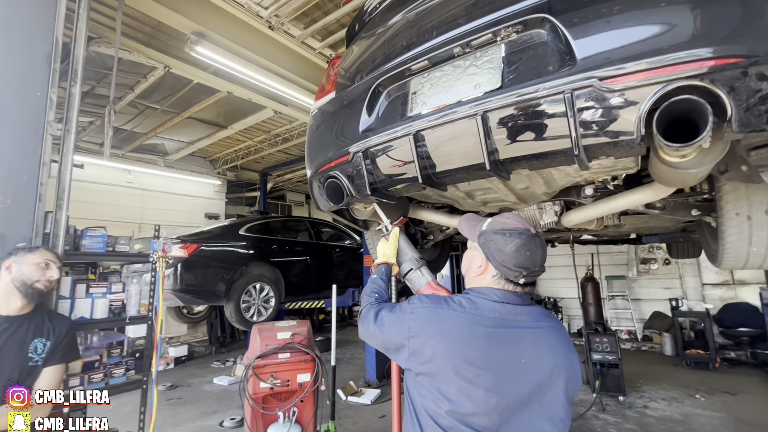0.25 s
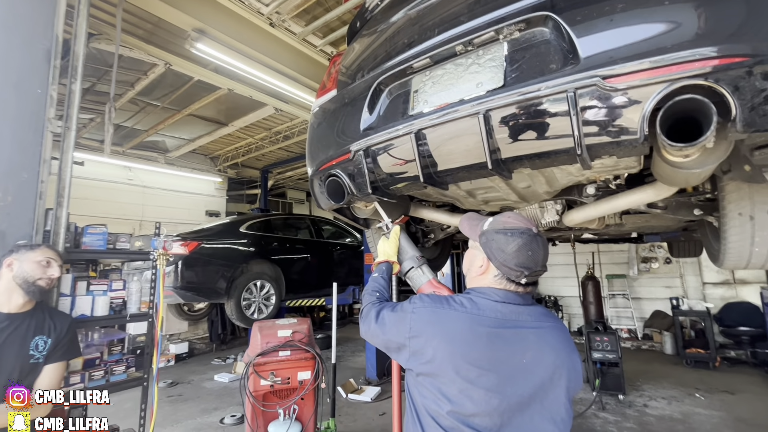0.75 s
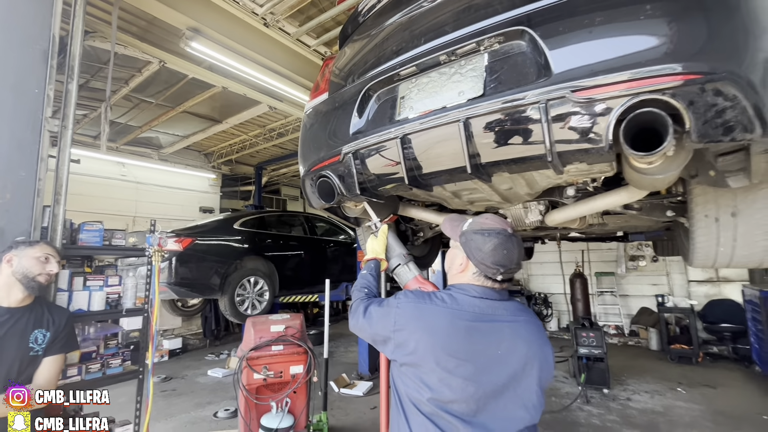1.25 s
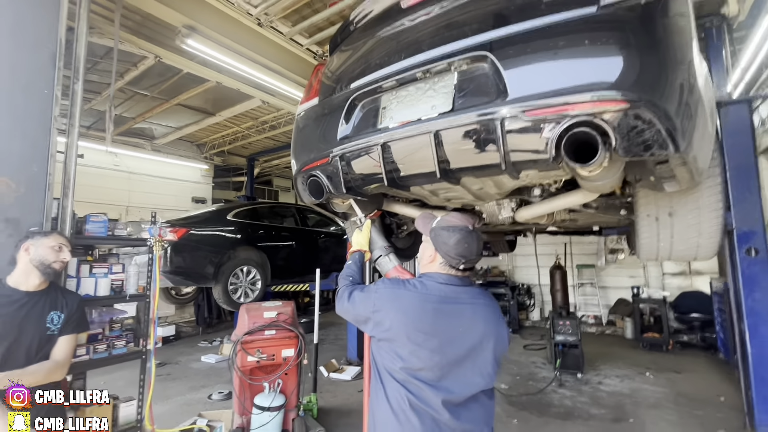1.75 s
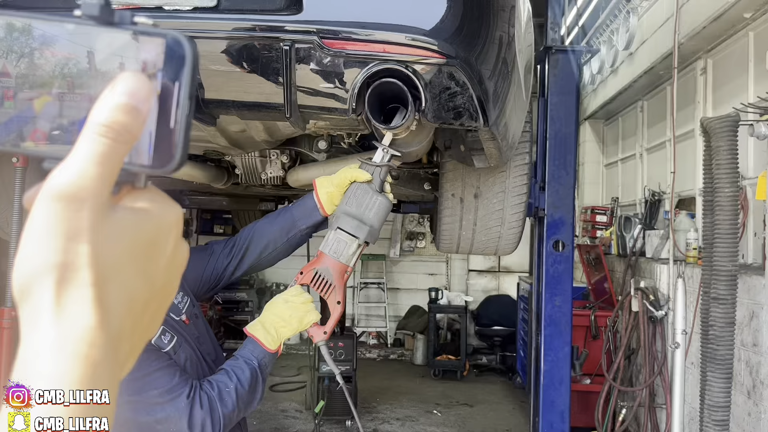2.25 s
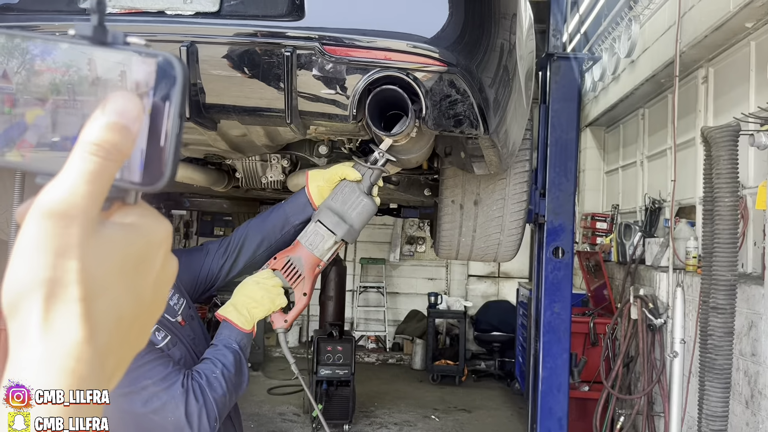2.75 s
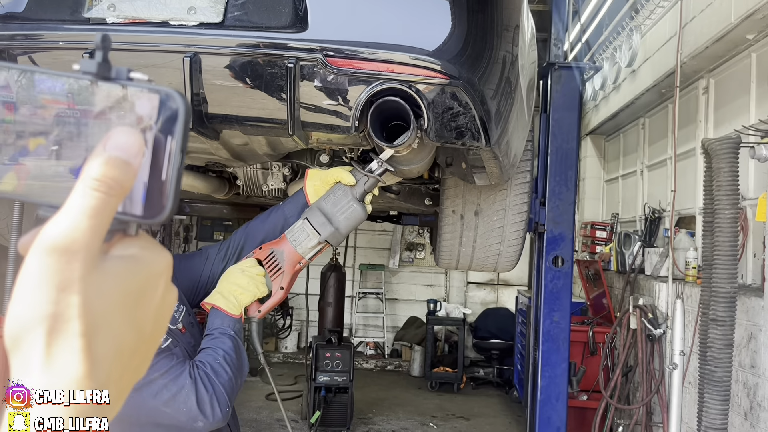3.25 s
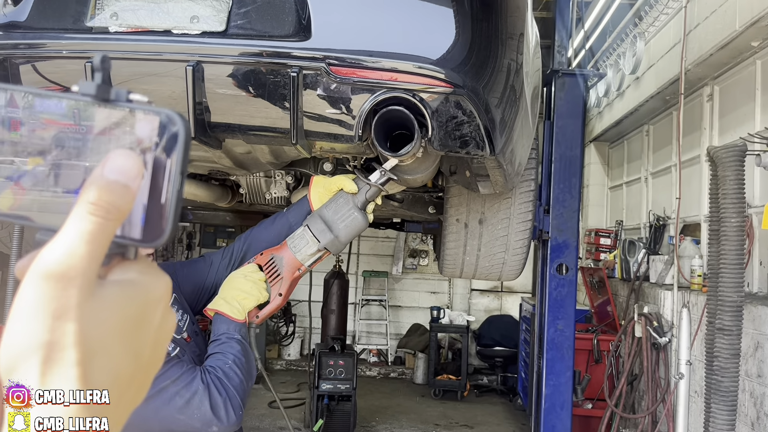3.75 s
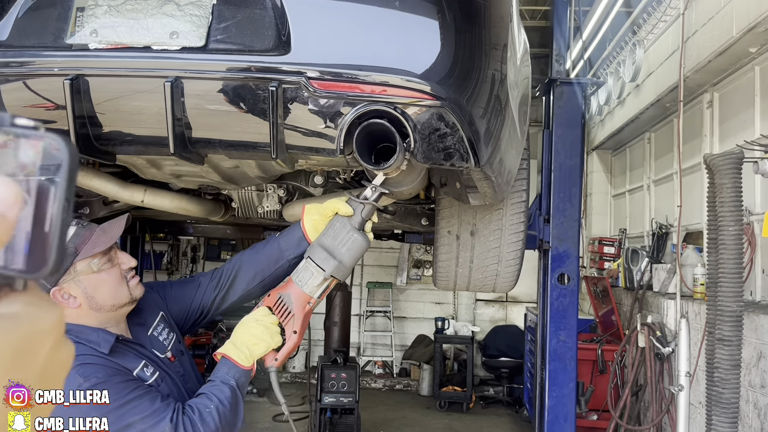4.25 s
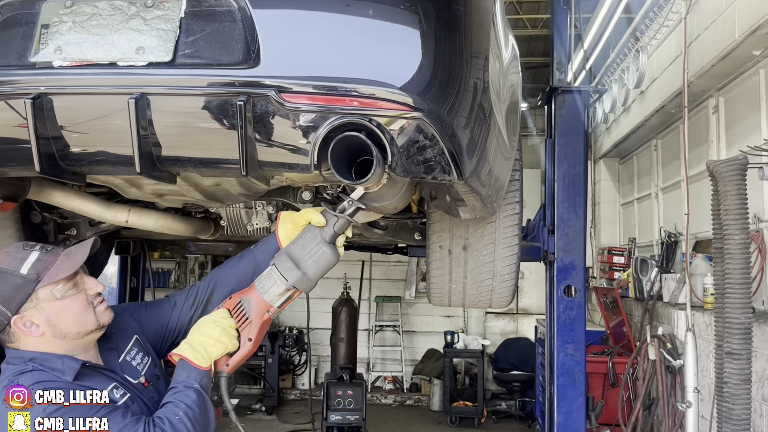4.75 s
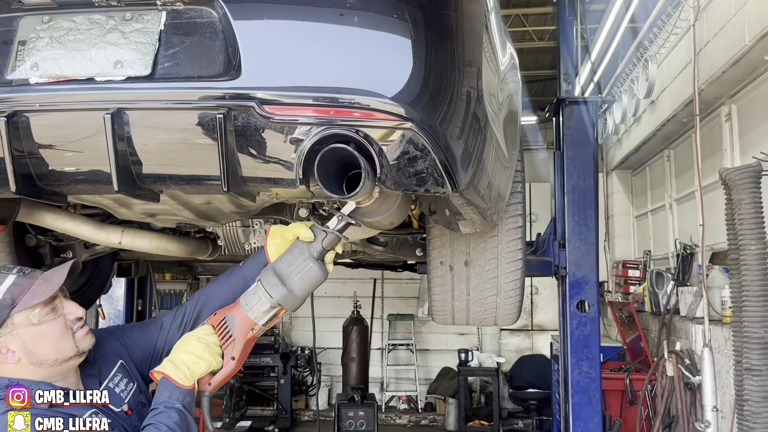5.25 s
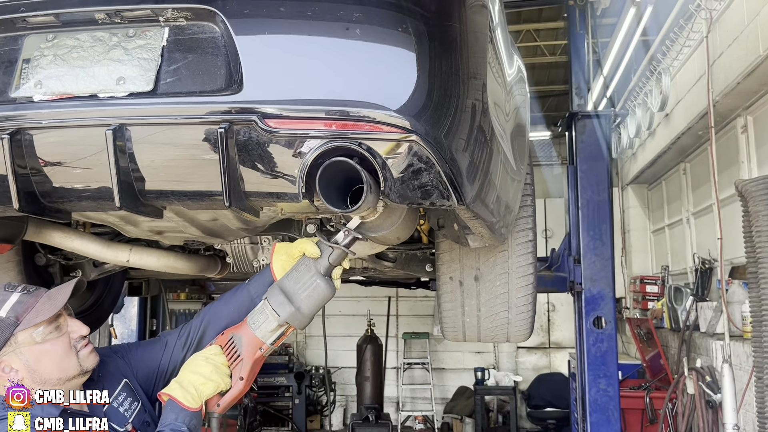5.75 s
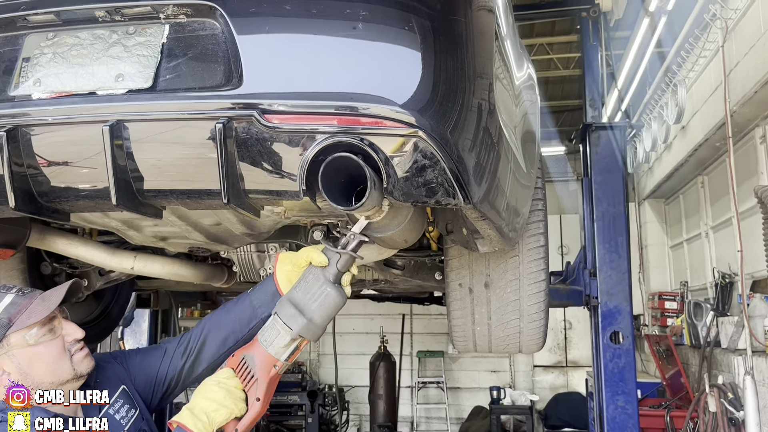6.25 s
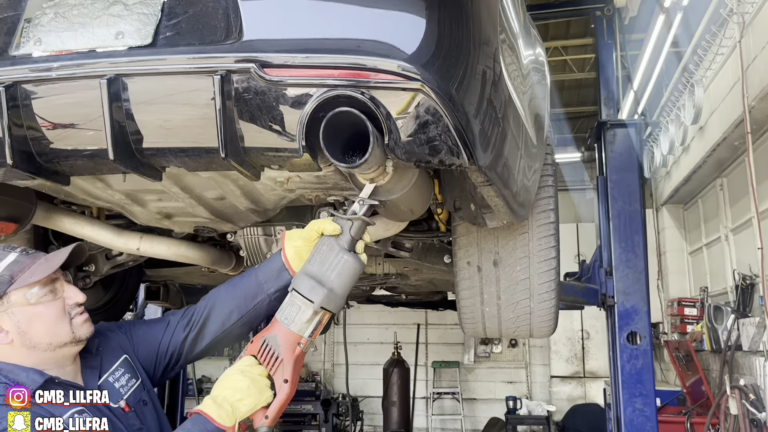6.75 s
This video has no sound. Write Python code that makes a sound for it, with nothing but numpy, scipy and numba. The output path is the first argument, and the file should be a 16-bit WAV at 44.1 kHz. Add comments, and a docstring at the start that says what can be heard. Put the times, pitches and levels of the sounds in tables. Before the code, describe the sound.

A corded reciprocating saw cuts steel exhaust pipes in a hard-walled repair shop, heard close in stereo. From 0 s it buzzes at about 46 strokes a second, with gear rattle, bright tooth rasp, a high wavering motor whine and light chattering on the pipe. Around 1.2-1.5 s the blade sinks in and binds; chatter fades and clear metallic tones sing until 2.25 s. At 2.3 s the sound dips almost to silence for an instant, then a second cut begins, slower near 43 strokes, rougher and more echoing. Harsh squealing scrapes dominate to about 3.1 s, then the rasp settles into loose slapping rattle. Low booms swell near 2.6, 3.9, 4.6 and 6.75 s; scraping returns around 4.2-4.4 s. The pipe wall rings near 5.6 s, a sharp snag briefly slows the saw at 6.1-6.3 s, and cutting continues to the end near 7 s.

```python
"""In a repair shop, under a lifted car, a corded reciprocating saw cuts a steel exhaust pipe: first one
tailpipe, then, after a brief dip, the other. The gear train's rattle repeats with the strokes and drifts
slowly, the teeth rasp as noise on the way out and back, and the motor fan whines as a wavering tone.
Slaps ring the pipe wall as chatter; it sings where the blade catches its modes.
Hard shop walls spread it all over two close microphones."""
import sys
import numpy as np
from scipy import signal
from scipy.fft import rfft, irfft, next_fast_len
from scipy.io import wavfile
from scipy.ndimage import uniform_filter1d
from numba import njit

SR = 44100
rng = np.random.default_rng(int(sys.argv[2]) if len(sys.argv) > 2 else 0)


def put_to_file(sound):
    """Save the sound as 16-bit audio at rate SR, in the file named by the first command-line argument."""
    columns = np.atleast_2d(sound).T  # one column per channel
    safe = np.clip(columns, -1, 1)
    whole_steps = np.round(safe * 32767)
    wavfile.write(sys.argv[1], SR, whole_steps.astype(np.int16))


N = 308259
TIME = np.arange(N) / SR
SIZE = next_fast_len(N + SR)
BINS = np.arange(SIZE // 2 + 1) * SR / SIZE  # Hz

# narrow resonances of the second steel tailpipe: mode_hz, lift_db
MODES_SECOND = [(1970, 2.7), (2083, 1.7), (2298, 3.3), (2640, 1.7), (2870, 4.6), (4387, 5.9), (4462, 3.6),
                (4618, 1.5), (4995, 2.5), (5717, 0.84), (6389, 8.2), (6782, 7.9), (11751, 5.6),
                (12979, 3.9)]
SECOND_CUT_S = 2.291  # the dip between the two cuts
WHINE_DB = -39


def undb(db):
    """Decibels to gain."""
    return 10 ** (np.asarray(db) / 20)


def curves(table):
    """The columns of a table, joined by straight lines in time."""
    s, *columns = np.transpose(table)
    return [np.interp(TIME, s, c) for c in columns]


def spectra(table):
    """The columns of a table, joined by straight lines in log frequency."""
    hz, *columns = np.transpose(table)
    return [np.interp(np.log(BINS + 1), np.log(hz), c) for c in columns]


def shape(x, response):
    """Filter by a frequency response."""
    return irfft(rfft(x, SIZE) * response, SIZE)[:N]


def unit(x):
    """Scale to rms 1."""
    return x / np.sqrt(np.mean(x ** 2))


def walk(rate):
    """Random levels, a new one every 1 / rate s, joined by straight slopes; rms 1."""
    hold = int(SR / rate)
    steps = np.repeat(rng.standard_normal(N // hold + 1), hold)
    return unit(uniform_filter1d(steps, hold)[:N])


def swell(middle, half):
    """A smooth rise to 1 and fall around a moment."""
    return np.exp(-((TIME - middle) / half) ** 2)


def lift(modes, width_hz):
    """Decibels that the pipe's narrow resonances add at each frequency."""
    return sum(db / (1 + (2 * (BINS - hz) / width_hz) ** 2) for hz, db in modes)


@njit
def resonate(x, hz, width):
    """State-variable band-pass with a moving centre."""
    y, band, low = np.empty(len(x)), 0., 0.
    for i in range(len(x)):
        g = np.tan(np.pi * hz[i] / SR)
        damping = width / hz[i]
        v = (band + g * (x[i] - low)) / (1 + g * (g + damping))
        band, low = 2 * v - band, low + 2 * g * v
        y[i] = damping * v
    return y


def blurred_tone(hz, width_hz):
    """Noise passed twice through a moving resonance."""
    noise = rng.standard_normal(len(hz))
    return unit(resonate(resonate(noise, hz, width_hz), hz, width_hz))


def crank(speed, unsteady):
    """Strokes counted since the start; the load makes the speed tremble."""
    return np.cumsum(speed * (1 + unsteady * walk(70))) / SR


def rattle(turn, lines=160, size=8192):
    """A rattle of equal harmonics that comes back alike with every turn of the crank."""
    one_turn = irfft(np.r_[0, np.exp(2j * np.pi * rng.random(lines))], size)
    return unit(np.interp(turn % 1, np.arange(size) / size, one_turn))


def gears(turn, shift):
    """The gear train's rattle changes slowly as the grip shifts."""
    drift = walk(2.055) * rattle(turn) + walk(2.96) * rattle(turn)
    return unit(rattle(turn) + shift * drift)


def saw(turn, body, modes, rattle_db, rasp_db, split_hz, mode_width_hz, loose, loose_hz,
        shake, shake_hz, throb_db, grit_db):
    """Gear rattle and tooth rasp through the resonances of saw and pipe, levelled below and above a split."""
    # the blade moves fastest twice a turn and bites harder on the pull
    bite = np.cos(4 * np.pi * turn) + 0.5 * np.cos(2 * np.pi * turn)
    teeth = unit(rng.standard_normal(N) * undb(throb_db * bite + grit_db * walk(700)))
    # play in the mechanism turns the higher lines into noise; the shaking car blurs the low ones
    regular = (1 - np.clip(loose, 0, 1)) / (1 + (BINS / loose_hz) ** 3)
    regular = regular * (1 - np.clip(shake, 0, 1) / (1 + (BINS / shake_hz) ** 4))
    # 160 lines about 45 Hz apart fill only part of the band that the noise fills
    line_density = np.sqrt(160 * 45 / (SR / 2))
    lines = shape(gears(turn, shift=0.46) * line_density, np.sqrt(regular))
    drive = lines + shape(teeth, np.sqrt(1 - regular))
    colour_db = spectra(body)[0] + lift(modes, mode_width_hz)
    sound = unit(shape(drive, undb(colour_db)))
    low = shape(sound, 1 / (1 + (BINS / split_hz) ** 6))
    return low * undb(rattle_db) + (sound - low) * undb(rasp_db)


def chatter(turn, hz, db, count, rebound, uneven, scatter_db, accent_db, sag, wander, scrape, width_hz):
    """The pipe wall slaps the blade once a stroke and rebounds, count knocks in all, on a wandering pitch."""
    angle = 2 * np.pi * turn
    knock = (count * (turn + uneven * np.sin(angle))).astype(int)
    scatter = np.clip(rng.standard_normal(1500), -1.5, 1.5)
    strength = undb(scatter_db * scatter[knock])
    main_or_rebound = np.where(knock % count, rebound, 1)
    slap = unit(np.diff(knock, prepend=0) * main_or_rebound * strength)
    # the wall also rubs, 3 dB up and down with the stroke
    rub = unit(undb(3 * np.cos(angle)) * rng.standard_normal(N))
    hz = hz * (1 + sag * np.cos(angle) + wander * walk(110))
    ring = slap * undb(accent_db) + scrape * rub
    for _ in range(3):
        ring = resonate(ring, hz, width_hz)
    return unit(ring) * undb(db)


def singing(turn, speed, catches, width_hz, throb_db, edge_s):
    """A caught mode takes the nearest multiple of the stroke rate, blurred by scraping, pumped by strokes."""
    out = np.zeros(N)
    for start, end, mode_hz, level_db, pure in catches:
        span = (TIME > start - edge_s) & (TIME < end + edge_s)
        t = TIME[span]
        hz = speed[span] * np.round(mode_hz / speed[span].mean())
        blur = blurred_tone(hz, width_hz)
        tone = np.sin(2 * np.pi * (np.cumsum(hz) / SR + rng.random()))
        held = np.clip(np.minimum(t - start, end - t) / (2 * edge_s) + .5, 0, 1)
        out[span] += undb(level_db) * held * unit(blur + pure * tone)
    pumping = undb(throb_db * (np.cos(2 * np.pi * turn) + .5 * walk(80)))
    return out * unit(pumping)


def fan(turn, db, flutter_db, swing):
    """The motor's whine, 190 cycles a stroke, its phase pulled to and fro by the load of each stroke."""
    angle = 2 * np.pi * 190 * turn + swing * np.sin(2 * np.pi * turn)
    flutter = undb(flutter_db * walk(25.3) + 2 * walk(3.5))
    return undb(db) * unit(np.sin(angle) * flutter)


def first_cut():
    """The blade skates and chatters on the first tailpipe, then sinks in, binds and sets it singing."""
    # colour of saw and pipe together: frequency_hz, level_db
    body_colour = [(28, -34), (44, -5.5), (80, -13), (130, -9), (250, -14), (580, -7.5), (830, -7),
                   (1400, -3), (2250, -7), (3000, -9), (4600, -12), (5800, -12), (8000, -14.5),
                   (10500, -11), (15000, -19.5)]
    # narrow resonances of the steel tailpipe: mode_hz, lift_db
    pipe_modes = [(2226, 0.5), (2266, 7), (2750, 4.5), (4403, 6), (4958, 8), (6626, 3), (9786, -11),
                  (10276, 0)]
    # the blade catches a mode and it sings: start_s, end_s, mode_hz, level_db, tone_to_blur (ratio)
    catches = [(0, .65, 975, -39, 3), (0, .7, 882, -41, 5), (0, .8, 2230, -38, 2), (0, .6, 2272, -39, 2),
               (.3, .7, 1066, -37, 4), (.3, .6, 1345, -37, 4), (0, 1.35, 1156, -40, 3),
               (.75, 1.3, 833, -40, 5), (.85, 1.1, 1295, -35, 3), (.85, 1.2, 1990, -36, 3),
               (.95, 1.15, 2635, -36, 3), (.95, 1.3, 2730, -39, 3), (1.26, 1.42, 1982, -32, 3),
               (1.3, 1.85, 276, -39, 2), (1.3, 1.85, 368, -41, 2), (1.36, 1.77, 1104, -31, 6),
               (1.35, 1.8, 830, -34.5, 6), (1.38, 1.6, 1658, -37, 4), (1.38, 2.28, 920, -35.5, 8),
               (1.35, 1.72, 1150, -36, 2), (1.75, 2.28, 1150, -29.5, 8), (1.78, 2.28, 1012, -39, 5),
               (1.79, 1.87, 1980, -32, 2), (1.94, 2.02, 1980, -31.5, 2), (2.06, 2.12, 1980, -32, 2),
               (2.18, 2.27, 1980, -33.5, 2)]
    # sinking into the wall slows the motor and stills the chatter
    sunk = 1 / (1 + np.exp((1.15 - TIME) / 0.17))
    speed = 46.39 - .39 * sunk  # strokes per second
    turn = crank(speed, unsteady=0.00209)
    binding_db = 3.5 * swell(1.48, 0.26)
    body = saw(turn, body_colour, pipe_modes, rattle_db=-24.5 + binding_db, rasp_db=-22.0 - 1.05 * sunk,
               split_hz=2150, mode_width_hz=116.0, loose=0.37, loose_hz=3000,
               shake=0.22, shake_hz=196, throb_db=0.1, grit_db=1.6)
    ticks = chatter(turn, hz=2080, db=-30 - 8 * sunk, count=4, rebound=.55, uneven=.09, scatter_db=2,
                    accent_db=0, sag=.02, wander=.025, scrape=.2, width_hz=680.)
    knocks = chatter(turn, hz=1170, db=-34.5 - 1 * sunk, count=3, rebound=.9, uneven=.03, scatter_db=3,
                     accent_db=0, sag=.02, wander=.04, scrape=.1, width_hz=700.)
    song = singing(turn, speed, catches, width_hz=35., throb_db=1.2, edge_s=.02)
    whine = fan(turn, WHINE_DB, flutter_db=2.5, swing=3.4)
    return body + ticks + knocks + song + whine


def snags(turn, throb_db, mode_width_hz):
    """Caught teeth scrape a whole cluster of pipe modes harshly, stroke by stroke."""
    # the moments the blade snags: middle_s, half_length_s, centre_hz, width_hz (of each of two passes), level_db
    snag_moments = [(2.325, .03, 2900, 350, -26), (2.36, .03, 2310, 220, -27.5),
                    (2.475, .025, 2300, 220, -25.5), (2.52, .16, 2080, 340, -29),
                    (2.6, .06, 2270, 240, -28.5), (2.8, .12, 2290, 190, -28), (2.95, .45, 2840, 200, -31.5),
                    (2.94, .02, 2300, 190, -28), (3.06, .1, 2300, 190, -28), (3.48, .15, 2300, 190, -34),
                    (4.17, .18, 2700, 480, -28.5), (4.28, .03, 2280, 220, -28), (4.42, .1, 2790, 450, -27),
                    (4.46, .03, 2300, 220, -30), (6.115, .035, 2250, 600, -28),
                    (6.125, .045, 3050, 700, -27.5), (6.5, .35, 2830, 250, -37)]
    out, steady = np.zeros(N), np.ones(N)
    strokes = undb(throb_db * np.cos(2 * np.pi * turn))
    scrape = shape(rng.standard_normal(N) * strokes, undb(lift(MODES_SECOND, mode_width_hz)))
    for middle, half, hz, width, level_db in snag_moments:
        ring = resonate(scrape, hz * steady, float(width))
        ring = resonate(ring, hz * steady, float(width))
        out += unit(ring) * undb(level_db) * swell(middle, half)
    return out


def boom(hz, db, width_hz, pure):
    """The whole exhaust shakes on its hangers: a low tone over its own blur."""
    tone = np.sin(2 * np.pi * np.cumsum(hz) / SR)
    return unit(blurred_tone(hz, width_hz) + pure * tone) * undb(db)


def shaft(turn, db):
    """The hum of the motor shaft, geared at 9.5 turns to the stroke."""
    return undb(db) * unit(np.sin(2 * np.pi * 9.5 * turn))


def wall_ring(slaps):
    """Each slap feeds the narrow modes of the half-cut wall, which ring on until the next."""
    # modes of the wall: mode_hz, width_hz, gain_db
    wall_modes = [(1537, 30, -7), (1622, 30, -2)]
    return sum(undb(db) * resonate(slaps, np.full(N, float(hz)), float(width))
               for hz, width, db in wall_modes)


def second_cut():
    """The saw is leaned on again and again; the other tailpipe loosens, rattling more and booming lower."""
    # colour of saw and pipe together: frequency_hz, level_db
    body_colour = [(28, -28), (42, 2), (85, -2.5), (130, 1), (185, -4.5), (240, -2.5), (340, -5),
                   (460, 0.5), (630, -6.5), (1150, 3), (1750, -1.5), (2300, 1.5), (2900, -0.6),
                   (3900, -5.5), (5400, -9), (7000, -7.5), (11000, -12), (13500, -13), (15000, -21)]
    # slapping of the half-cut wall: time_s, level_db, resonance_hz
    slap_course = [(2.33, -30.5, 1460), (2.62, -30, 1450), (2.75, -26.3, 1440), (3.25, -28, 1430),
                   (3.55, -26.4, 1440), (4.05, -27.8, 1390), (4.3, -33, 1410), (4.48, -33.5, 1410),
                   (4.6, -28.5, 1360), (5.45, -29.2, 1480), (6.1, -29.2, 1470), (6.95, -30, 1420)]
    # strokes on which the wall slaps the blade hard: time_s, lift_db
    hard_slaps = [(2.689, 3), (2.808, 1.5), (2.855, 1.5), (2.925, 2.5), (3.018, 2.5), (3.065, 2.5),
                  (3.369, 2), (3.416, 2), (3.463, 2), (3.511, 2), (3.558, 2.5), (3.651, 2), (3.698, 1.5),
                  (5.201, 3), (5.317, 2), (5.481, 2), (5.504, 2), (5.692, 2), (5.739, 1.5), (6.021, 2.5),
                  (6.208, 3.5), (6.232, 3), (6.303, 3.5)]
    # leaning on the saw slows it and shakes the exhaust:
    # middle_s, half_length_s, slowing_hz (strokes per second), boom_lift_db
    presses = [(2.6, .35, .152, 11), (3.85, .3, .393, 6), (4.6, .4, .062, 9), (6.3, .12, .838, 1),
               (6.75, .27, .129, 10)]
    # the blade catches a mode and it sings: start_s, end_s, mode_hz, level_db, tone_to_blur (ratio)
    catches = [(2.3, 2.37, 2087, -30, 2), (2.385, 2.46, 2087, -25.5, 3), (2.49, 2.58, 2087, -24, 3),
               (2.6, 2.665, 2050, -28.5, 1.5), (2.48, 2.66, 1970, -32, 1.5), (2.3, 2.36, 2940, -29, 1.5),
               (2.3, 2.6, 213, -39.5, 6), (2.6, 3.1, 213, -45, 4), (2.3, 3.9, 128, -45, 2),
               (2.3, 2.66, 1450, -37, 3), (2.65, 2.9, 1410, -36, 3), (3.07, 3.18, 1970, -30.5, 3),
               (3.2, 3.38, 1970, -38, 2), (3.35, 3.6, 2645, -31.5, 3), (3.4, 3.7, 170, -44, 2),
               (4.22, 5.15, 298, -45, 3), (4.53, 4.6, 1970, -34, 2), (4.6, 5.6, 255, -51, 4),
               (4.98, 5.03, 1970, -34, 2), (5.0, 6.95, 213, -46, 4), (5.3, 6.4, 298, -48, 2.5),
               (5.35, 5.41, 1970, -36.5, 3), (5.59, 5.65, 1970, -34, 3), (5.79, 5.84, 1970, -36, 3),
               (5.8, 6.25, 170, -43.5, 2), (6.05, 6.15, 3310, -38, 1), (6.098, 6.135, 2300, -28.5, 2),
               (6.1, 6.145, 1970, -29.5, 3), (6.11, 6.3, 2875, -34, 2.5), (6.12, 6.15, 3030, -32, 1.5),
               (6.215, 6.25, 1970, -33, 3), (6.3, 6.55, 2875, -38, 2)]
    elapsed = np.maximum(TIME - SECOND_CUT_S, 0)
    through_s = 7.3  # when the wall would part
    stiffness = np.clip(1 - elapsed / (through_s - SECOND_CUT_S), .01, 1) ** 0.125
    slowing = sum(hz * swell(middle, half) for middle, half, hz, _ in presses)
    shaken_db = sum(db * swell(middle, half) for middle, half, _, db in presses)
    speed = 42.724 - slowing  # strokes per second
    turn = .19 + crank(speed, unsteady=0.0022)
    fresh_db = 10 * np.exp(-elapsed / 1.43)  # the rasp starts loud and settles
    rasp_db = -27.5 + fresh_db + 10.5 * (1 - stiffness)
    body = saw(turn, body_colour, MODES_SECOND, rattle_db=-26.0 + 2.3 * (1 - stiffness), rasp_db=rasp_db,
               split_hz=2750, mode_width_hz=45., loose=0.73, loose_hz=2430,
               shake=0.97, shake_hz=700, throb_db=0.6, grit_db=1.33)
    slap_db, slap_hz = curves(slap_course)
    accent_db = sum(db * swell(s, .006) for s, db in hard_slaps)
    slaps = chatter(turn, hz=slap_hz, db=slap_db, count=3, rebound=.4, uneven=0, scatter_db=1.4,
                    accent_db=accent_db, sag=.035, wander=.024, scrape=.2, width_hz=265.)
    free_ring = wall_ring(slaps) * swell(5.65, .55)
    song = singing(turn, speed, catches, width_hz=52.0, throb_db=1.9, edge_s=.012)
    hangers = boom(81 * stiffness, db=-49.5 + shaken_db, width_hz=18.0, pure=2.2)
    scrapes = snags(turn, throb_db=0.5, mode_width_hz=30.0)
    whine = fan(turn, WHINE_DB, flutter_db=1.5, swing=0.33)
    hum = shaft(turn, db=-61.5 + 14 * swell(6.2, 1.2))
    return body + slaps + free_ring + song + hangers + scrapes + whine + hum


def shop(x, ports, wet_db, t60):
    """Direct sound reaches the two microphones with a lag; wall echoes reach them unalike."""
    likeness, lead, balance_db = spectra(ports)
    likeness = np.clip(likeness, 0, .99)
    t = TIME[:SR // 2]
    tails = rng.standard_normal((2, len(t))) * undb(-60 * t / t60) * (t > .003)
    common, apart = rfft(tails / np.linalg.norm(tails, axis=1, keepdims=True), SIZE)
    direct_and_echo = (1 + undb(wet_db) * common) / np.hypot(1, undb(wet_db))
    mid = np.sqrt((1 + likeness) / 2) * direct_and_echo
    side = np.sqrt((1 - likeness) / 2) * apart
    left = shape(x, (mid + side) * undb(balance_db / 2))
    right = shape(x, (mid - side) * undb(-balance_db / 2) * np.exp(-1j * lead))
    return np.array([left, right])


def scene():
    """Two cuts, each heard from its own microphone place, joined by a quick fade out and in."""
    # the microphone pair in each place:
    # frequency_hz, likeness (0-1), left_lead_rad, left_minus_right_db
    ports_first = [(100, 0.98, 0, 2.4), (400, 0.86, -1.5, -1), (580, 0.88, -3.3, -1.2),
                   (750, 0.6, -4.9, -3.5), (1100, 0.6, -6.5, -1), (1800, 0.61, -6.6, -4.5),
                   (2500, 0.58, -4.9, -2.4), (3300, 0.29, -4.5, 3), (4500, 0.2, -5.1, 4),
                   (5700, 0.45, -3.1, 0.5), (8000, .5, -3.4, -2), (9000, 0.5, -5.4, -2.5),
                   (11000, 0.85, -6.1, -1), (13000, .8, -6.7, 0), (14700, .75, -9, 0)]
    ports_second = [(100, .99, 0, 1.5), (350, .92, -.3, .1), (600, .65, -.6, -2.5), (780, .68, 1, -2.9),
                    (1050, .69, 0, -1.1), (1500, .55, .4, -2.4), (1900, .84, 0, .3), (2900, .74, 1.3, .9),
                    (4700, .69, 1, 2.7), (6500, .79, -1.1, 2.2), (8200, .99, -3.1, 0), (9000, .85, -3.6, 0),
                    (11000, .7, -5.9, 0), (13000, .65, -6.7, 0), (14700, .6, -9.2, 0)]
    fade_out = np.clip((SECOND_CUT_S - TIME) / 0.029, 0, 1)
    fade_in = np.clip((TIME - SECOND_CUT_S) / 0.031, 0, 1)
    first = shop(first_cut(), ports_first, wet_db=-25.0, t60=0.31)
    second = shop(second_cut(), ports_second, wet_db=-7.0, t60=0.33)
    return fade_out * first + fade_in * second


def record(dry):
    """The phone drops the rumble below 30 Hz and cuts the top above 14.8 kHz."""
    x = signal.sosfilt(signal.butter(4, 30, "high", fs=SR, output="sos"), dry)
    return signal.sosfilt(signal.ellip(14, .2, 90, 14800, fs=SR, output="sos"), x)


dry = scene()
out = record(dry)
put_to_file(out)
```